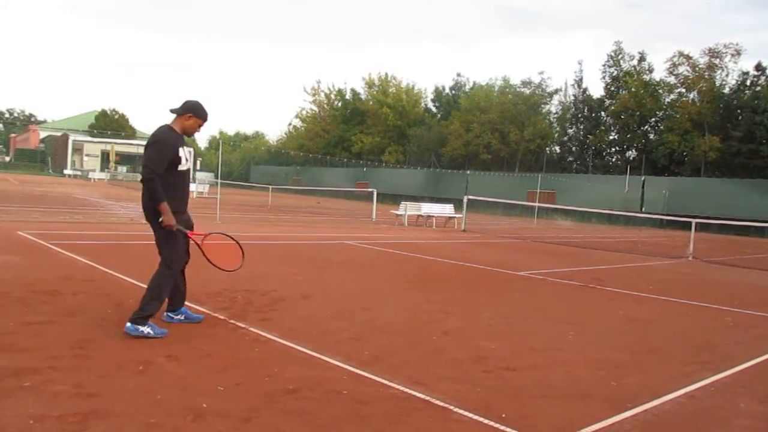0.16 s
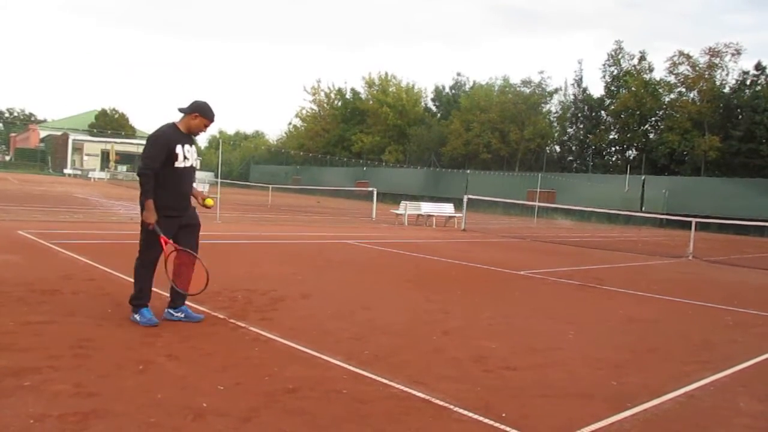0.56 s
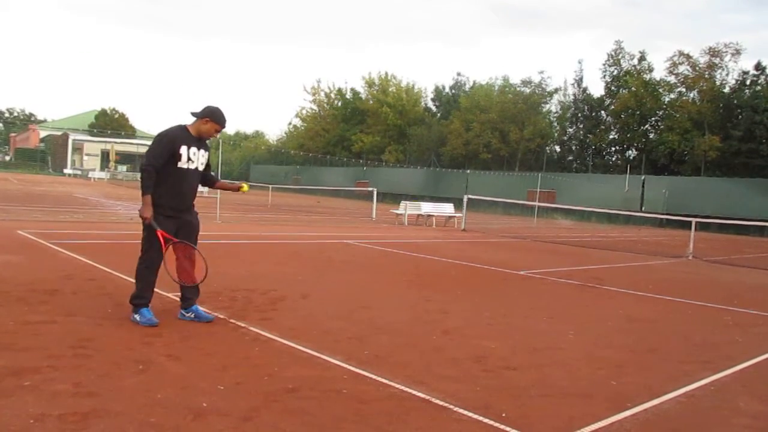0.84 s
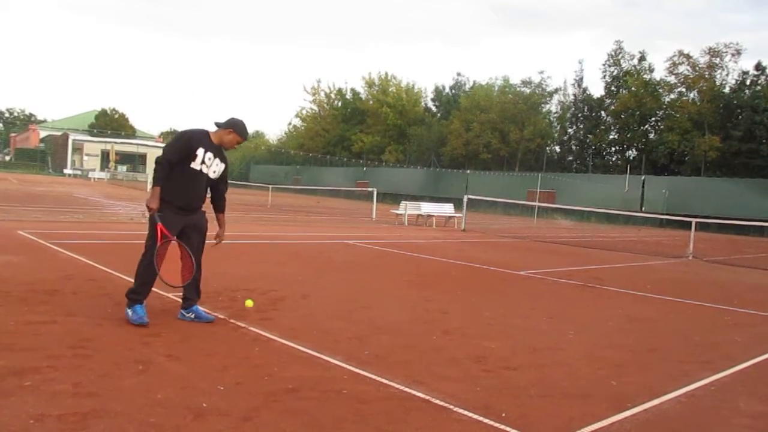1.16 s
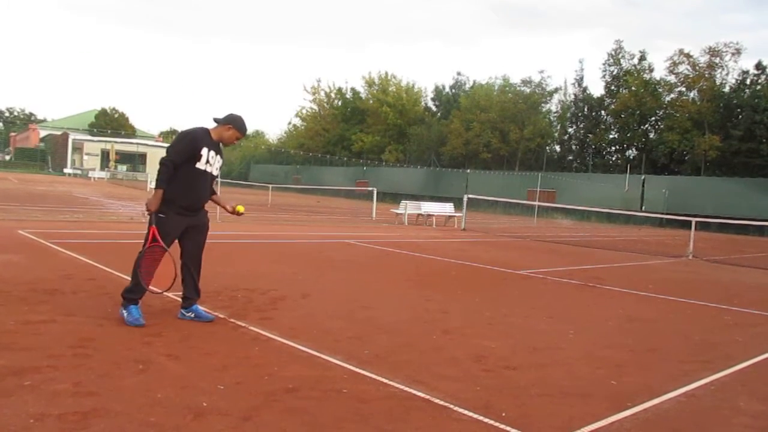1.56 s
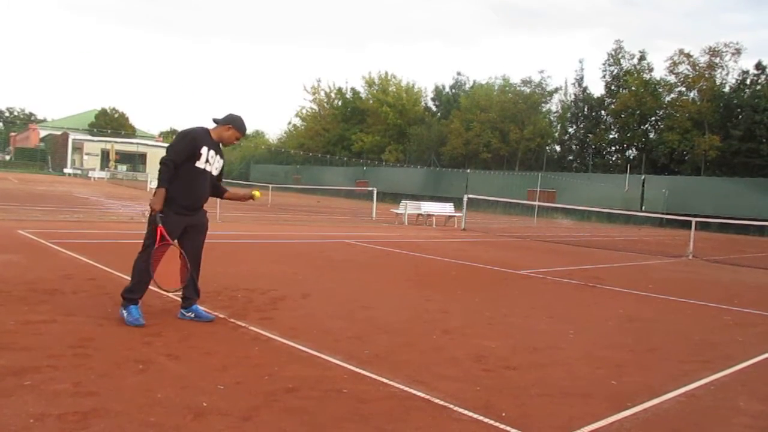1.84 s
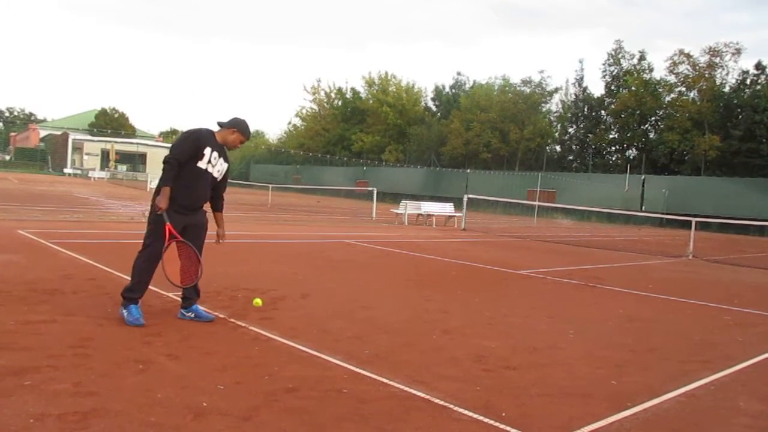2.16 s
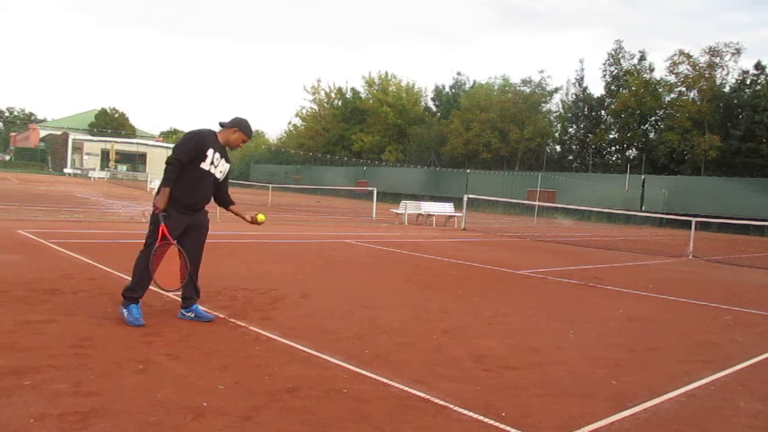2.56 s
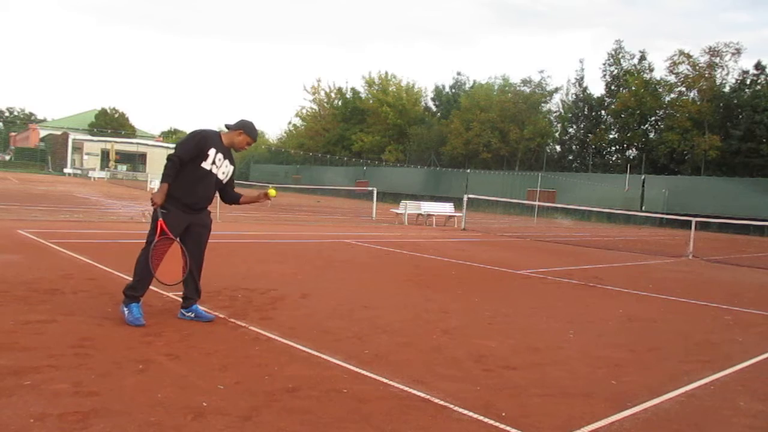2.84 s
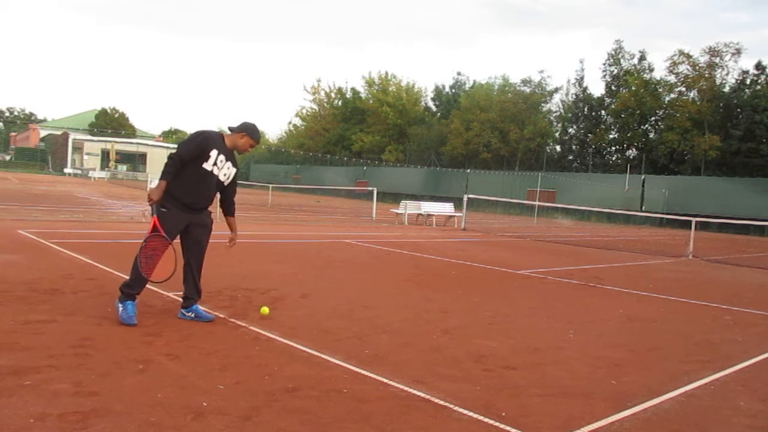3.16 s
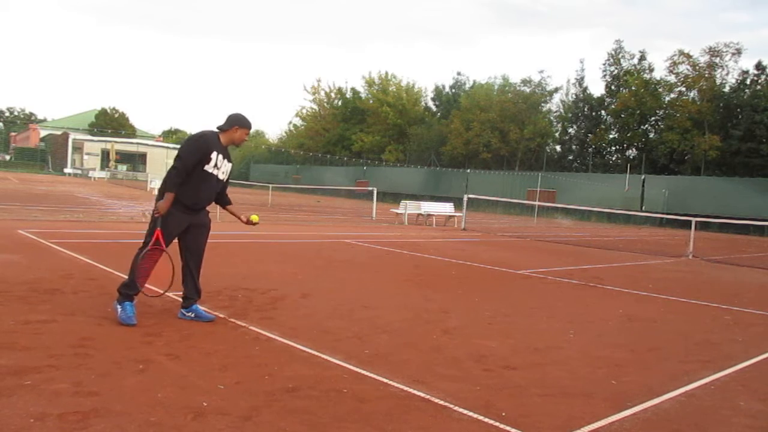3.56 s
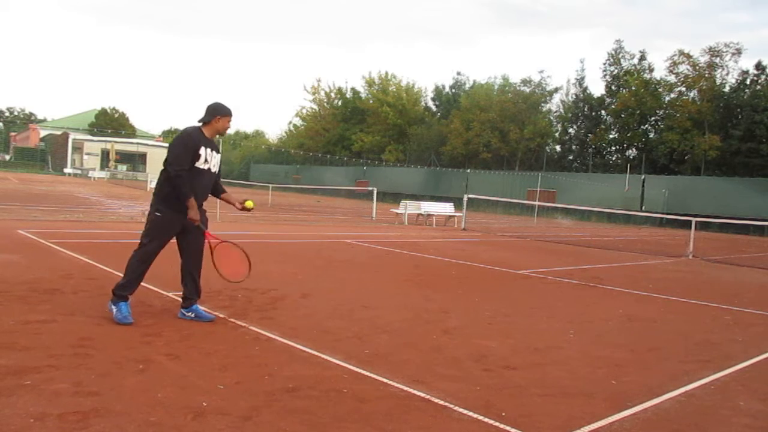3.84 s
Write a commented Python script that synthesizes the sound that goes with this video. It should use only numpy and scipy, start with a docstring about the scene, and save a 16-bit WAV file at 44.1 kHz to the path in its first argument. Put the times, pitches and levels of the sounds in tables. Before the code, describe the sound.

Three short dull tennis ball bounces on clay, after gusty wind rumble that fades away

```python
"""Tennis ball on outdoor clay

A ball bounces three times: each click rings decaying modes, crushes grit and returns one faint echo.
Wind is fluttering banded noise with single pressure swings and raspy bursts; it dies away after two seconds.
Shoes scuff as dense tiny grains with a few cracking stones; a sleeve brushes once as soft noise.
A distant rush of noise with soft hiss and thin whines grows louder; late on, a pulsed tone chirps as an insect."""
import sys
import numpy as np
from scipy import signal
from scipy.io import wavfile

SR = 44100
rng = np.random.default_rng(int(sys.argv[2]) if len(sys.argv) > 2 else 0)


def log_audio(samples):
    """Write samples as a 16-bit WAV file to the path given in sys.argv[1]."""
    # one column per channel
    frames = np.atleast_2d(samples).T
    # limit to full scale, then quantise
    limited = np.clip(frames, -1, 1)
    pcm = np.round(limited * 32767).astype(np.int16)
    wavfile.write(sys.argv[1], SR, pcm)


N = 176400  # four seconds


def from_db(db):
    """Decibels to gain."""
    return 10 ** (np.asarray(db) / 20)


def rms_one(x):
    """Scale to unit power."""
    return x / np.sqrt(np.mean(x ** 2) + 1e-20)


def seconds():
    """Time of every sample."""
    return np.arange(N) / SR


def in_time(rows):
    """Each column of a curve at every sample."""
    s, *columns = np.transpose(rows)
    return [np.interp(seconds(), s, column) for column in columns]


def drift(rate_hz):
    """Slow random movement with spread 1: noise through two equal poles at the given rate."""
    step = 40  # samples between the computed points
    pole = np.exp(-2 * np.pi * rate_hz * step / SR)
    noise = rng.standard_normal(N // step + 2002)
    slow = signal.lfilter([1], [1, -2 * pole, pole * pole], noise)[2000:]  # drop the settling
    return np.interp(np.arange(N) / step, np.arange(len(slow)), rms_one(slow))


def passed(x, hz, kind, order=2):
    """Butterworth filter."""
    sos = signal.butter(order, np.clip(hz, 10, SR / 2 - 1), kind, fs=SR, output="sos")
    return signal.sosfilt(sos, x + 1e-18)


def band_noise(low_hz, high_hz, order=2):
    """Steady noise between two edges, power 1."""
    noise = rng.standard_normal(N + SR // 2)
    return rms_one(passed(noise, [low_hz, high_hz], "band", order=order)[-N:])


def noise_bands(colour, count):
    """Noise split into bands (centre Hz, samples) that follow a colour; total power 1."""
    hz, db = np.transpose(colour)
    edges = np.geomspace(hz[0], hz[-1], count + 1)
    centres = np.sqrt(edges[1:] * edges[:-1])
    # the colour is a density, so wider bands carry more power
    gains = from_db(np.interp(np.log(centres), np.log(hz), db)) * np.sqrt(np.diff(edges))
    gains = gains / np.linalg.norm(gains)
    return [(centres[k], gains[k] * band_noise(edges[k], edges[k + 1], order=4)) for k in range(count)]


# Wind strength before flutter. Each row: time in seconds, level in dB.
WIND_STRENGTH = [(0, -28), (.025, -23), (.04, -16.5), (.068, -17), (.09, -27), (.17, -29), (.21, -20),
                 (.25, -29), (.285, -26), (.335, -28), (.375, -25), (.415, -30), (.45, -26), (.48, -33),
                 (.52, -26), (.55, -26), (.605, -27), (.635, -24), (.70, -37), (.78, -45), (.86, -30),
                 (.91, -26), (.952, -23), (.98, -27), (1.08, -26), (1.17, -39), (1.22, -28), (1.31, -32),
                 (1.40, -29), (1.49, -51), (1.57, -48), (1.67, -36), (1.76, -47), (1.81, -43), (1.87, -42),
                 (1.92, -50), (1.98, -42), (2.07, -58), (2.3, -70)]
# Wind colour at the reference strength. Each row: frequency in Hz, relative density in dB per Hz.
WIND_SPECTRUM = [(25, -5.5), (60, 5), (130, 4), (200, 3), (280, -2), (390, -4), (510, -14.5), (640, -20.5),
                 (850, -40.5), (1300, -61.5), (2000, -66)]
# above the start frequency, each octave gains this many extra dB per dB of strength over the reference
WIND_REFERENCE_DB, BRIGHTEN_FROM_HZ, BRIGHTEN_PER_OCTAVE = -21.5, 174, 1
WIND_FLUTTER_DB, WIND_FLUTTER_HZ, WIND_PATCHY_DB = 4.3, 45, 2


def wind():
    """Fluttering turbulence on the microphone; stronger gusts reach higher in pitch."""
    strength_db, = in_time(WIND_STRENGTH)
    strength_db = strength_db + WIND_FLUTTER_DB * np.tanh(drift(WIND_FLUTTER_HZ))
    out = np.zeros(N)
    for hz, band in noise_bands(WIND_SPECTRUM, count=16):
        octaves_up = max(np.log2(hz / BRIGHTEN_FROM_HZ), 0)
        brighter_db = BRIGHTEN_PER_OCTAVE * octaves_up * (strength_db - WIND_REFERENCE_DB)
        patchy_db = WIND_PATCHY_DB * drift(60)
        out += band * from_db(strength_db + brighter_db + patchy_db)
    return out


# Background level. Each row: time in seconds, distant rush in dB, hiss in dB.
BACKGROUND_LEVELS = [(0, -55.5, -74.5), (.35, -55.5, -77.5), (1.1, -54, -73.5), (2.2, -49.5, -70),
                     (3.0, -46, -67.5), (3.5, -44.5, -65.5), (4.0, -41, -63.5)]
# Colour of the distant rush. Each row: frequency in Hz, relative density in dB per Hz.
RUSH_COLOUR = [(15, -39), (25, -5.5), (65, -1.5), (119, 1), (152, -0.5), (198, -9), (233, -6), (403, -14.5),
               (606, -16), (773, -13), (1030, -11.5), (2010, -27.5), (3200, -34.5), (4160, -71),
               (7040, -120)]
# Colour of the hiss. Each row: frequency in Hz, relative density in dB per Hz.
HISS_COLOUR = [(2000, -17.5), (3400, -1), (4700, 0), (9040, -4.5), (12000, -9), (15500, -15.5)]
# Faint thin whines. Each row: centre frequency in Hz, level relative to the hiss in dB.
WHINE_TONES = [(3200, -19.5), (6402, -32), (11793, -35.5)]
RUSH_PATCHY_DB, HISS_PATCHY_DB, WHINE_WAVER_HZ = 1, .5, .78
# the middle of the rush comes forward, reaching this level at the very end
SWELL_END_DB, SWELL_DB_PER_S, SWELL_LOW_HZ, SWELL_HIGH_HZ = -52, 9.5, 432, 1110


def background():
    """Distant rush, hiss and thin whines: drifting noise bands and wavering sines that grow louder overall."""
    rush_db, hiss_db = in_time(BACKGROUND_LEVELS)
    rush = sum(band * from_db(RUSH_PATCHY_DB * drift(19)) for _, band in noise_bands(RUSH_COLOUR, count=28))
    hiss = sum(band * from_db(HISS_PATCHY_DB * drift(8.2)) for _, band in noise_bands(HISS_COLOUR, count=16))
    whines = np.zeros(N)
    for hz, db in WHINE_TONES:
        phase = 2 * np.pi * np.cumsum(hz + WHINE_WAVER_HZ * drift(32)) / SR
        whines += from_db(db) * rms_one(np.sin(phase))
    swell_db = SWELL_END_DB + SWELL_DB_PER_S * (seconds() - N / SR)
    swell = from_db(swell_db) * band_noise(SWELL_LOW_HZ, SWELL_HIGH_HZ, order=3)
    return from_db(rush_db) * rush + from_db(hiss_db) * (hiss + whines) + swell


def puff(turns, width):
    """One short swing of pressure: a cosine under a bell, width in periods."""
    return np.cos(2 * np.pi * turns) / np.cosh(np.clip(turns / width, -20, 20))


# Single eddies slap the microphone.
# Each row: centre in seconds, level of the slow swing in dB, its period in seconds,
# level of the sharp core relative to the swing in dB.
EDDY_SLAPS = [(.0375, -16, .004, -20), (.0457, -14, .0036, -19), (.0607, -15, .003, -9),
              (.0735, -15, .003, -20), (.1153, -11.5, .0044, -20), (.2143, -3.7, .0034, -11.5),
              (.237, -18, .0045, -32), (.2775, -18, .005, -25), (.3025, -16.5, .0038, -21),
              (.3728, -14, .0048, -17), (.431, -19, .005, -32), (.520, -17.5, .0045, -22),
              (.5445, -22, .0025, -10), (.553, -17, .0042, -22), (.572, -20, .0042, -22),
              (.628, -16, .004, -20), (.915, -15, .007, -30), (.943, -14, .0065, -16),
              (.9575, -13, .0055, -20), (.996, -16.5, .004, -19), (1.0415, -21, .004, -24),
              (1.075, -22, .003, -22), (1.279, -22, .005, -26), (1.661, -27, .008, -30),
              (1.803, -23, .011, -30), (1.844, -28, .0065, -30)]
# the core swings this many times faster; widths are in periods of each swing
EDDY_WIDTH_PERIODS, CORE_WIDTH_PERIODS, EDDY_CORE_FASTER = .36, .21, 2.1


def eddies():
    """Each eddy is one short swing of pressure with a faster core, a dull thump."""
    out = np.zeros(N)
    for s, db, period, core_db in EDDY_SLAPS:
        turns = (seconds() - s) / period
        swing = puff(turns, EDDY_WIDTH_PERIODS)
        core = puff(turns * EDDY_CORE_FASTER, CORE_WIDTH_PERIODS)
        out -= from_db(db) * (swing + from_db(core_db) * core)
    return out


# Brief bursts of rougher, higher turbulence. Each row: centre in seconds, half length in seconds, level in dB.
ROUGH_BURSTS = [(.063, .009, -22.5), (.217, .004, -25), (.546, .006, -31), (.952, .011, -31),
                (.997, .005, -35)]
BURST_LOW_HZ, BURST_HIGH_HZ = 330, 770


def bursts():
    """The airflow breaks up for a moment and rasps: band noise under short bells."""
    level = sum(from_db(db) * np.exp(-((seconds() - s) / half) ** 2) for s, half, db in ROUGH_BURSTS)
    return level * band_noise(BURST_LOW_HZ, BURST_HIGH_HZ, order=4)


def crunch(s, db, t60, low_hz, high_hz):
    """Grit is crushed at once: a sharp snap of noise that dies fast."""
    since = seconds() - s
    decay = np.exp(-np.log(1000) * np.clip(since / t60, 0, 10))
    return from_db(db) * (since >= 0) * decay * band_noise(low_hz, high_hz)


# Shoes scrape the grit. Each row: start in seconds, length in seconds, level in dB, low edge in Hz.
SHOE_SCUFFS = [(0.143, 0.042, -67, 1550), (0.179, 0.088, -67, 1470), (0.465, 0.036, -69, 3750),
               (0.49, 0.077, -65.5, 2000), (0.59, 0.094, -72.5, 2010), (0.854, 0.033, -71.5, 1800),
               (3.149, 0.031, -58.5, 4800), (3.853, 0.064, -63.5, 4500)]
# Single stones crack under a sole.
# Each row: start in seconds, level in dB, t60 in seconds, low edge in Hz, high edge in Hz.
STONE_CRACKS = [(.4605, -59, .06, 3700, 8500), (.5402, -51, .012, 1200, 5000),
                (1.2895, -53, .022, 5400, 8500)]
SCUFF_TOP_HZ, SCUFF_ATTACK_SHARE, GRAINS_PER_S, GRAIN_SPREAD_DB = 8150, .2, 2600, 2


def shoes():
    """Soles drag over the clay: dense tiny grains under a quick rise and a slower fall; a few stones crack."""
    hits = rng.random(N) < GRAINS_PER_S / SR
    grains = hits * rng.standard_normal(N)
    grains = grains * from_db(GRAIN_SPREAD_DB * np.minimum(rng.exponential(1, N), 4))
    out = np.zeros(N)
    for s, length, db, low_hz in SHOE_SCUFFS:
        stroke = np.interp(seconds(), [s, s + SCUFF_ATTACK_SHARE * length, s + length], [0, 1, 0])
        scrape = passed(passed(grains, low_hz, "high", order=3), SCUFF_TOP_HZ, "low", order=3)
        out += from_db(db) * np.sqrt(stroke) * rms_one(scrape)
    return out + sum(crunch(*row) for row in STONE_CRACKS)


# the sleeve brushes as the arm swings
RUSTLE_S, RUSTLE_HALF_LENGTH_S, RUSTLE_DB, RUSTLE_LOW_HZ, RUSTLE_HIGH_HZ = 1.18, .03, -69, 1850, 2400


def sleeve():
    """A soft brush of cloth: narrow noise under one bell."""
    swing = np.exp(-((seconds() - RUSTLE_S) / RUSTLE_HALF_LENGTH_S) ** 2)
    return from_db(RUSTLE_DB) * swing * band_noise(RUSTLE_LOW_HZ, RUSTLE_HIGH_HZ)


# The ball hits the clay.
# Each row: time in seconds, strike level in dB, brightness of the contact in Hz, pitch ratio of the ring.
BALL_BOUNCES = [(1.2581, -31, 2200, 1.03), (2.2078, -28.7, 2100, 1), (3.2286, -22.5, 3000, 1)]
# What the ball rings with. Each row: frequency at pitch ratio 1 in Hz, relative level in dB, t60 in seconds.
BALL_RING = [(147, -11, .08), (250, -4.5, .04), (320, -3.5, .034), (680, -12, .02), (1100, -2.5, .022),
             (1260, -2.5, .022), (2130, -16, .0074), (3000, -23, .0046)]
BALL_LOW_CUT_HZ = 133
GRIT_DB, GRIT_T60_S, GRIT_LOW_HZ, GRIT_HIGH_HZ = -27.5, .0052, 4800, 7200  # dB relative to the strike
ECHO_S, ECHO_DB = .0195, -22


def ball():
    """Each bounce rings the hollow ball briefly, crunches a little grit and returns one faint echo."""
    t, out = seconds(), np.zeros(N)
    for s, db, contact_hz, pitch in BALL_BOUNCES:
        click = from_db(db) * (np.arange(N) == int(s * SR))
        push = passed(passed(click, BALL_LOW_CUT_HZ, "high"), contact_hz, "low", order=3)
        for hz, mode_db, t60 in BALL_RING:
            pole = np.exp(-np.log(1000) / (t60 * SR))
            turn = 2 * np.pi * hz * pitch / SR  # radians per sample
            ring = signal.lfilter([0, np.sin(turn)], [1, -2 * pole * np.cos(turn), pole * pole], push)
            out -= from_db(mode_db) * ring
        out += crunch(s, db + GRIT_DB, GRIT_T60_S, GRIT_LOW_HZ, GRIT_HIGH_HZ)
    echo = np.interp(t - ECHO_S, t, out)
    return out + from_db(ECHO_DB) * echo


# a faint insect in the distance; its level is the one at the start and climbs from there
INSECT_FROM_S, INSECT_HZ, INSECT_WAVER_HZ = 3.04, 3200, 18
INSECT_START_DB, INSECT_DB_PER_S, CHIRPS_PER_S = -74.5, 4.5, 8.6


def insect():
    """A thin wavering tone, pulsing at a regular pace."""
    since = seconds() - INSECT_FROM_S
    chirps = (since > 0) * np.sin(np.pi * CHIRPS_PER_S * since) ** 4
    phase = 2 * np.pi * np.cumsum(INSECT_HZ + INSECT_WAVER_HZ * drift(56)) / SR
    tone = rms_one(np.sin(phase))
    return from_db(INSECT_START_DB + INSECT_DB_PER_S * since) * chirps * tone


def scene():
    """Everything at one microphone."""
    return (ball() + wind() + eddies() + bursts() + shoes() + sleeve() + insect() + background())[None]


CUTOFF_HZ = 15700


def record(dry):
    """The top is cut steeply by an elliptic low-pass."""
    steep = signal.ellip(10, .1, 70, CUTOFF_HZ, fs=SR, output="sos")  # ripple .1 dB, stop 70 dB
    return signal.sosfilt(steep, dry)


dry = scene()
out = record(dry)
log_audio(out)
```